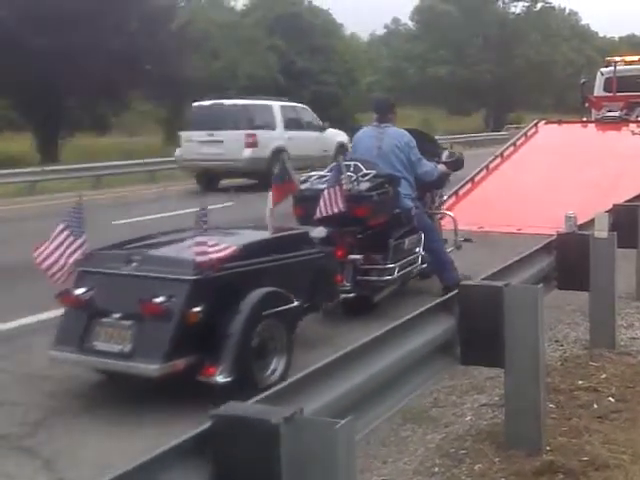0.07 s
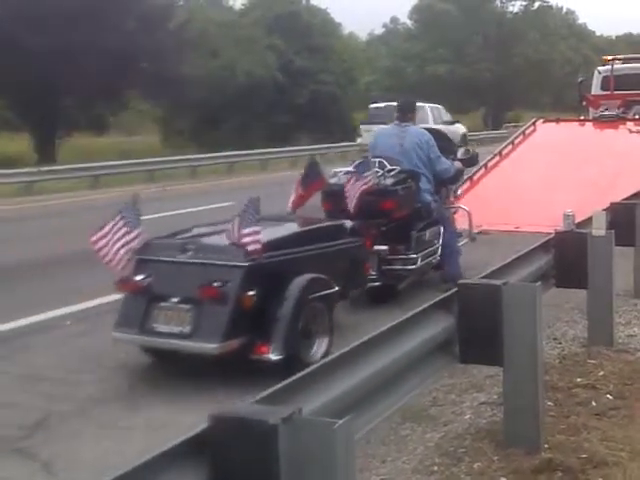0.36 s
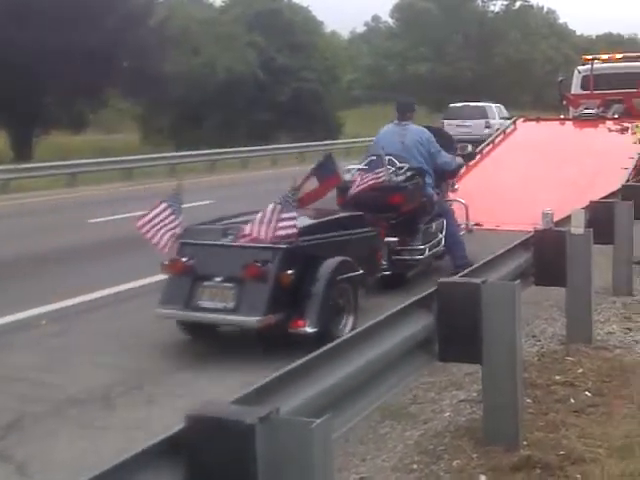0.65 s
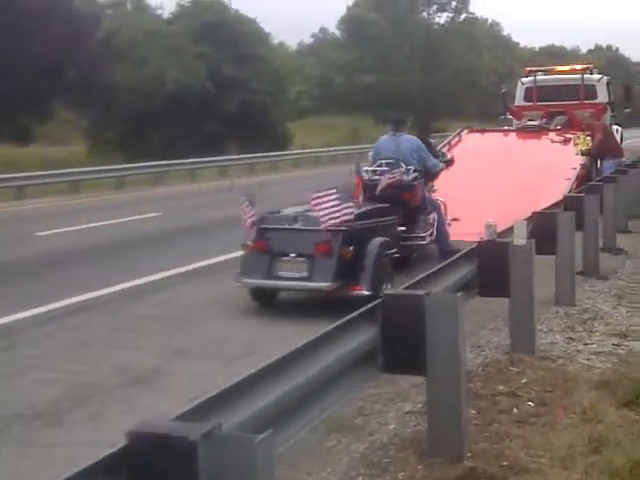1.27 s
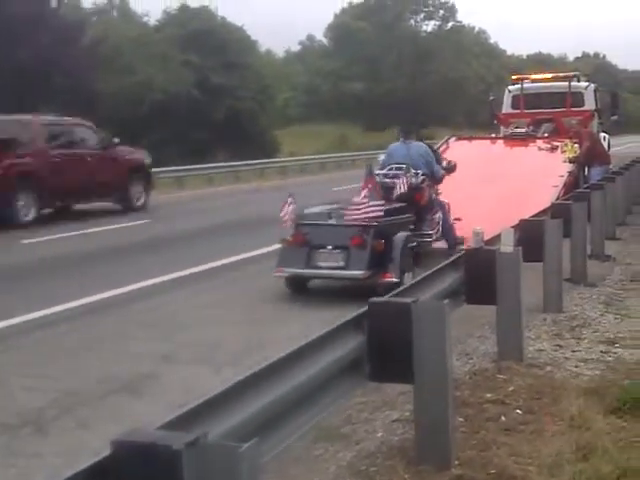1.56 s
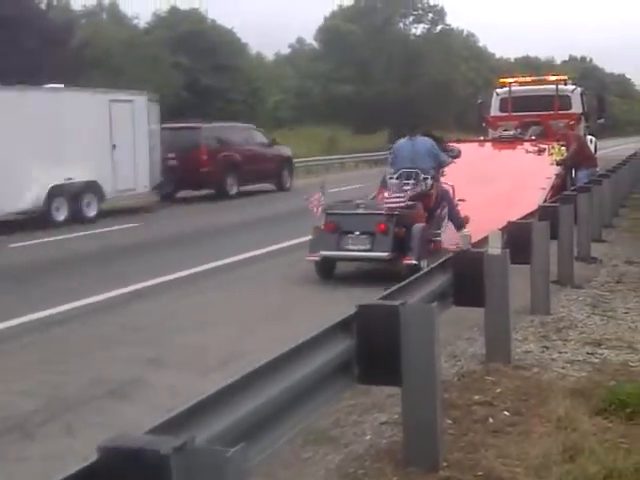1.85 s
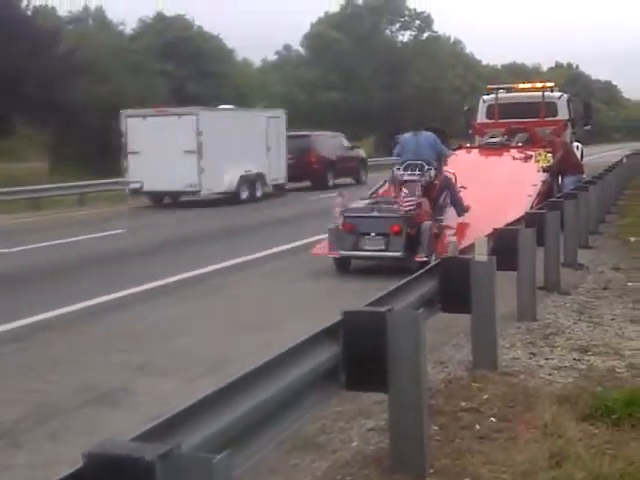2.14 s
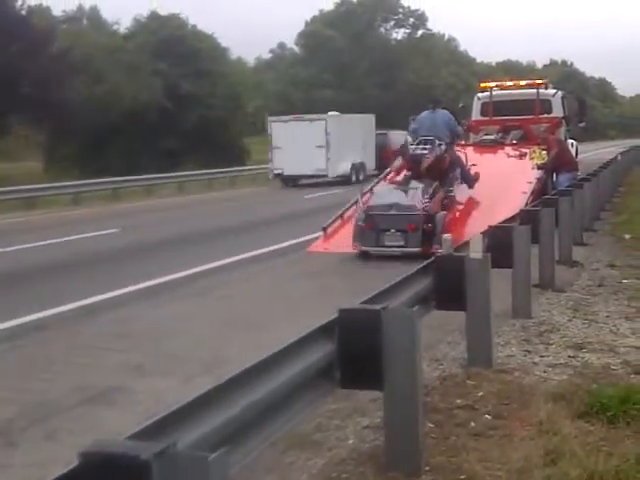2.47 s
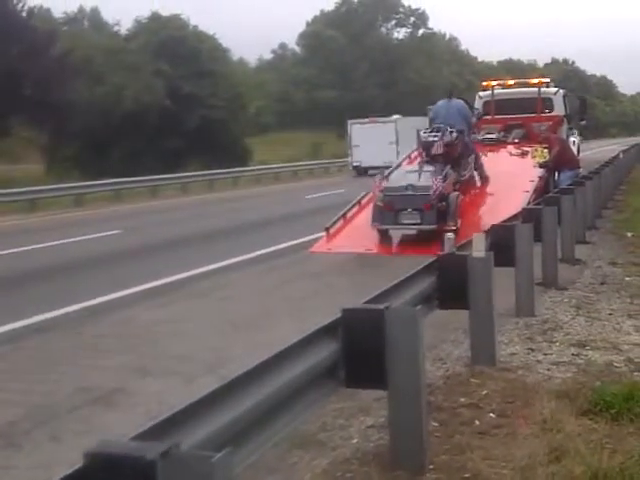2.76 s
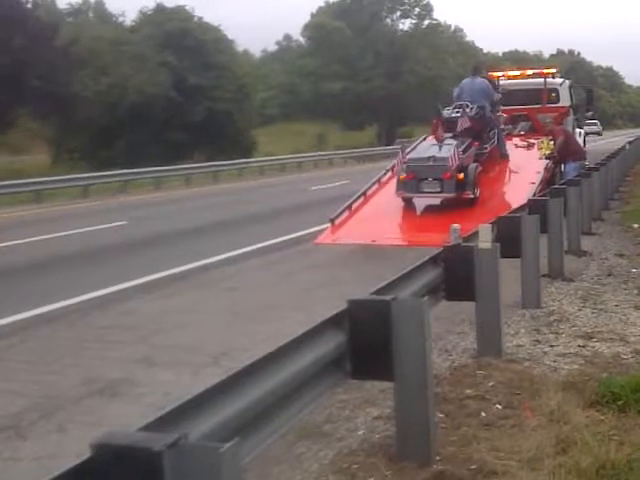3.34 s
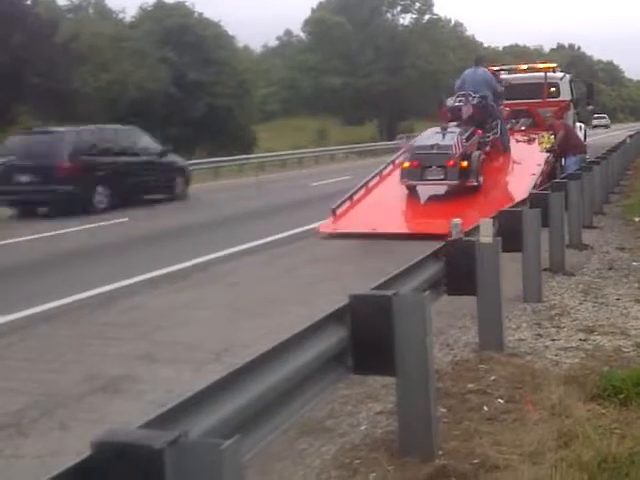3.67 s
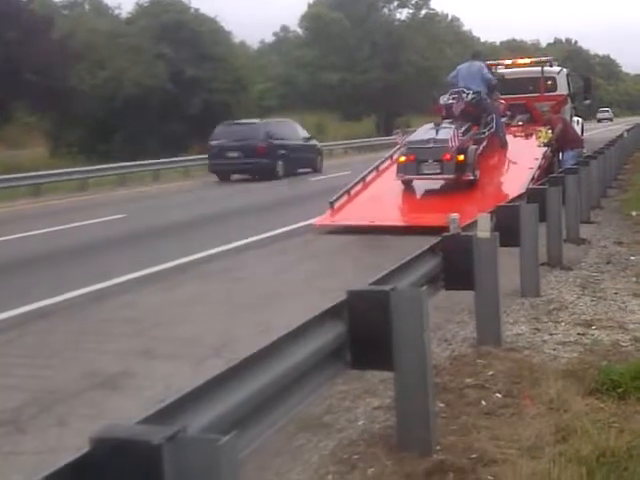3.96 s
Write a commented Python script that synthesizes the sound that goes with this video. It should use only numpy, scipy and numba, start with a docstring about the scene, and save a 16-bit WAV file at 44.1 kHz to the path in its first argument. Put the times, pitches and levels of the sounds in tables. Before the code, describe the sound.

A motorcycle engine chugs close by on a highway shoulder, moves off and falls to a quieter, uneven idle. Cars rush by in the near lanes, a trailer tyre whines briefly midway, and distant traffic rumbles throughout.

```python
"""A V-twin motorcycle pulls away along a highway shoulder, then drops to a lumpy idle.
Each cylinder thumps its own exhaust pipe and lets out a puff of gas that barks and hisses.
Cars sweep past in the near lanes, their tyre noise mirrored by the road, over the wash and rumble
of farther traffic. An SUV with a trailer passes, a trailer tyre whining briefly."""
import sys
import numpy as np
from scipy import signal
from scipy.fft import rfft, irfft
from scipy.io import wavfile
from scipy.ndimage import map_coordinates
from numba import njit

SR = 44100
rng = np.random.default_rng(int(sys.argv[2]) if len(sys.argv) > 2 else 0)


def transcribe(signal):
    """Save signal, clipped to [-1, 1], as a 16-bit WAV file at the path in sys.argv[1]."""
    frames = np.atleast_2d(signal).T
    limited = np.clip(frames, -1, 1)
    pcm = np.round(limited * 32767).astype(np.int16)
    wavfile.write(sys.argv[1], SR, pcm)


N = 176400


def undb(db):
    """Decibels to gain."""
    return 10 ** (np.asarray(db) / 20)


def curve(rows, t, column=1):
    """Table column, linearly interpolated."""
    rows = np.array(rows)
    return np.interp(t, rows[:, 0], rows[:, column])


def noise(spectrum):
    """Unit-rms noise of a given spectral shape, rolled off beyond both ends."""
    hz, db = np.array(spectrum).T
    f = np.maximum(np.fft.rfftfreq(N, 1 / SR), 1)
    gain = undb(np.interp(np.log(f), np.log(hz), db))
    gain *= np.minimum(f / hz[0], 1) ** 2 * np.minimum(hz[-1] / f, 1) ** 2
    y = irfft(rfft(rng.standard_normal(N)) * gain, N)
    return y / y.std()


def delayed(x, lag_s):
    """Time-varying delay."""
    return map_coordinates(x, [np.arange(N) - lag_s * SR], order=3, mode="mirror")


@njit
def resonate(x, hz, width_hz):
    """State-variable band-pass, unity gain at its moving centre."""
    y, band_state, low_state = np.empty(len(x)), 0., 0.
    for i in range(len(x)):
        g, damping = np.tan(np.pi * hz[i] / SR), width_hz / hz[i]
        band = (band_state + g * (x[i] + 1e-18 - low_state)) / (1 + g * (g + damping))
        band_state = 2 * band - band_state
        low_state += 2 * g * band
        y[i] = damping * band
    return y


def ringing(x, modes):
    """Parallel bank of static resonances."""
    return sum(undb(db) * resonate(x, np.full(N, float(hz)), float(width)) for hz, width, db in modes)


# engine speed (time [s], speed [rpm])
ENGINE_RPM = [(0, 1631.1), (.089, 1575), (.286, 1686.9), (.549, 1555.2), (.834, 1520.9), (1.168, 1505.5),
              (1.384, 1591.3), (1.647, 1691.4), (1.919, 1861.6), (2.123, 1843.2), (2.401, 1744.7),
              (2.481, 1571.7), (2.65, 1494.5), (2.836, 1383.7), (3.05, 1302.1), (3.244, 1212.5),
              (3.579, 1129.6), (3.8, 1152.6), (4, 1137.7)]


def firings(t):
    """Firing times of both cylinders: once each per two turns, unevenly spaced."""
    cycles = np.cumsum(curve(ENGINE_RPM, t)) / SR / 120
    first_s = np.interp(np.arange(int(cycles[-1]) + 1), cycles, t)
    return first_s, first_s[:-1] + 0.424 * np.diff(first_s)


# exhaust thump colour at THUMP_REF_RPM: pipe rings plus, in A, a broad 420 Hz band that sharpens
# each thump (frequency [Hz], width [Hz], gain [dB], polarity)
THUMP_A_BANDS = [(50, 51, 31.8, -1), (50, 300, 34, 1), (179.6, 14, 44.7, 1), (420, 184, 40, 1)]
THUMP_B_BANDS = [(71, 23, 27.5, 1), (195.7, 128, 45.6, 1), (184.9, 19.3, 51, -1), (242.6, 41, 42.5, -1)]
THUMP_REF_RPM, THUMP_RISE_PER_RPM = 1579, 0.00026


def pipe_thump(t, times_s, level_db, bands):
    """Pressure pulses thump a pipe; the colour rises with engine speed."""
    kicks = np.zeros(N)
    kicks[np.clip((times_s * SR).astype(int), 0, N - 1)] = undb(level_db)
    pulse = np.hanning(int(0.0052 * SR))
    pressure = np.convolve(kicks, pulse / pulse.sum(), "same")
    tuning = 1 + THUMP_RISE_PER_RPM * (curve(ENGINE_RPM, t) - THUMP_REF_RPM)
    return sum(polarity * undb(db) * resonate(pressure, hz * tuning, float(width))
               for hz, width, db, polarity in bands)


# firing strength (time [s], level [dB])
THROTTLE_DB = [(0, 2.5), (.4, 5), (1.1, 3), (1.9, 4), (2.39, 4), (2.47, -6), (2.63, -4), (2.76, -9),
               (2.97, -9.5), (3.15, -6.5), (3.33, -6), (3.5, -12), (4, -8.5)]
# weak firings at idle (time [s], gain [dB])
WEAK_FIRINGS = [(2.51, -5), (2.585, -21), (2.745, -24), (2.92, -10.5), (3.10, -28), (3.92, -18)]
# gas puff per cylinder at t = 0
# (attack [s], crack decay [s], tail level [dB], tail decay [s], hiss level [dB], bark level [dB])
GAS_PUFFS = [(.002, 0.002, -12, 0.032, -1.5, -2.5), (.003, .008, -13, 0.035, -2.5, -1)]
PUFF_LEAD_S, THUMP_LAG_S, JITTER_S = 0.0032, 0.001, 0.0003


def cylinder(t, times_s, bands, puff):
    """Each firing thumps the pipe and vents gas; returns thump, hiss envelope, bark envelope."""
    level_draw, time_draw, hiss_draw = rng.standard_normal((len(times_s), 3)).T
    firing_db = curve(THROTTLE_DB, times_s) + 0.5 * level_draw
    for at_s, drop_db in WEAK_FIRINGS:
        firing_db += drop_db * (abs(times_s - at_s) < 0.02)
    thump = pipe_thump(t, times_s + THUMP_LAG_S + JITTER_S * time_draw, firing_db - 3, bands)
    attack_s, crack_s, tail_db, tail_s, hiss_db, bark_db = puff
    blur = 1 + 0.45 * t  # puffs grow blunter and less even as the pipes move off
    uneven_db = 0.6 * (0.5 + 1.2 * times_s) * hiss_draw
    attack_s, crack_s = attack_s * blur, crack_s * np.sqrt(blur)
    latest = np.maximum(np.searchsorted(times_s - PUFF_LEAD_S, t) - 1, 0)
    age_s = t - times_s[latest] + PUFF_LEAD_S
    fall_s = np.maximum(age_s - attack_s, 0)
    decay = np.exp(-fall_s / crack_s) + undb(tail_db) * np.exp(-fall_s / tail_s)
    gas = np.clip(age_s / attack_s, 0, 1) * decay
    hiss_env = gas * undb(hiss_db + firing_db + uneven_db)[latest]
    bark_env = gas ** 0.9 * undb(bark_db + firing_db)[latest]  # lingers between firings
    return np.array([thump, hiss_env, bark_env])


def metal_scatter(x, t, t60_s=0.25, wet_db=-7):
    """Short diffuse tail from the guardrail and nearby vehicles."""
    tail = rng.standard_normal(N) * undb(-60 * t / t60_s)
    return undb(wet_db) * signal.fftconvolve(x, tail / np.linalg.norm(tail))[:N]


# gas noise spectra (frequency [Hz], relative density [dB])
HISS_SPECTRUM = [(1500, -20), (2700, 0.5), (3300, -19.5), (3800, 5.5), (4700, 5.5), (5500, 0), (6500, -3),
                 (7400, -19.5), (8200, -35.5)]
BARK_SPECTRUM = [(240, -17.5), (330, 1.5), (420, -2), (520, 0.5), (720, 0), (1050, 11.5), (1500, -6),
                 (1850, 0), (2300, -16.5), (3300, -20)]
# hiss, bark and shell ring as the bike moves off (time [s], gain [dB])
HISS_GAIN_DB = [(0, -26.5), (.45, -30), (1.1, -29), (1.5, -35.5), (2.0, -41), (2.4, -43), (3.2, -38),
                (4, -34)]
BARK_GAIN_DB = [(0, -27), (.7, -27.5), (1.0, -25.5), (1.3, -24.5), (1.7, -27), (2.1, -36), (4, -39.5)]
SHELL_GAIN_DB = [(0, -24.5), (.8, -27), (1.6, -33.5), (2.3, -31.5), (4, -38)]
# silencer shell, pipe ends, a low boom that fills out each thump (frequency [Hz], width [Hz], gain [dB])
SHELL_MODES = [(308, 21, 4), (336.6, 39, 10)]
TIP_MODES = [(4000, 46, -7), (4240, 57, 1), (4750, 42, -1)]
LOW_BOOM_MODES = [(133, 45, -10.5)]


def motorcycle(t, sputter_depth=0.21):
    """Both pipes thump; sputtering gas rings pipe ends and shell and reflects off the asphalt."""
    cylinders = zip(firings(t), (THUMP_A_BANDS, THUMP_B_BANDS), GAS_PUFFS)
    thump, hiss_env, bark_env = sum(cylinder(t, *parts) for parts in cylinders)
    sputter = np.exp(sputter_depth * noise([(100, 0), (500, 0)]) - sputter_depth ** 2)
    hiss = hiss_env * sputter * noise(HISS_SPECTRUM) * undb(curve(HISS_GAIN_DB, t))
    bark = bark_env * noise(BARK_SPECTRUM)
    shell = ringing(bark, SHELL_MODES) * undb(curve(SHELL_GAIN_DB, t))
    bark *= undb(curve(BARK_GAIN_DB, t))
    gas = 0.42 * hiss + 0.4 * ringing(hiss, TIP_MODES) + bark + shell
    thump = thump + ringing(thump, LOW_BOOM_MODES)
    road_echo = 0.14 * delayed(gas, 0.000472 / (1 + 0.26 * t))  # lag shrinks with distance
    return thump + gas + metal_scatter(bark + undb(-5) * thump, t) + road_echo


# tyre roar (frequency [Hz], relative density [dB])
TYRE_SPECTRUM = [(60, -4.5), (250, -1), (450, -2.5), (650, -4), (900, 4.5), (1300, -2), (1900, -23),
                 (2600, -15.5), (3300, -27), (5000, -32), (7000, -39)]
# cars when abreast (time [s], level [dB], distance [m], road echo lag [s],
# tread pitch [Hz], tread gain [dB], groove hiss gain [dB])
CAR_PASSES = [(-.6, -29, 9, .0015, 1090, -0.5, -16.5), (1.12, -34, 8, .0015, 645, 8, -12.5),
              (1.6, -31.5, 7, .0008, 1464, 6.5, -7.5), (3.03, -32, 3, .0009, 1164, 1.5, 2.5),
              (3.329, -35.5, 6, .0016, 580, 0.5, -6), (4.1, -32, 14, 0.001, 1095, -5.5, -12.5)]
CAR_M_S, SOUND_M_S = 29, 343
TREAD_WIDTH_HZ, GROOVE_HZ, GROOVE_WIDTH_HZ = 176, 2680, 920


def passing_cars(t):
    """Doppler-shifted tyre noise; the road echo combs it, lowest when the car is abreast."""
    out = 0
    for at_s, db, lane_m, echo_s, tread_hz, tread_db, groove_db in CAR_PASSES:
        range_m = np.hypot(CAR_M_S * (t - at_s), lane_m)
        nearness = lane_m / range_m
        modes = [(tread_hz, TREAD_WIDTH_HZ, tread_db), (GROOVE_HZ, GROOVE_WIDTH_HZ, groove_db)]
        roar = noise(TYRE_SPECTRUM)
        direct = delayed(roar + ringing(roar, modes), (range_m - lane_m) / SOUND_M_S)
        road_echo = 0.55 * delayed(direct, echo_s * nearness)
        out += (direct + road_echo) * undb(db) * nearness
    return out


# traffic wash and engine rumble (frequency [Hz], relative density [dB])
WASH_SPECTRUM = [(230, -11.5), (450, -15), (650, -18), (900, -2.5), (1170, 3.5), (1500, -2), (1900, -8.5),
                 (2600, -15.5), (3400, -35.5), (5000, -31), (7000, -46.5)]
RUMBLE_SPECTRUM = [(40, -21.5), (65, -5.5), (100, -5), (120, 2), (138, -6.5), (158, 6.5), (190, -9.5),
                   (235, -9), (275, -7.5), (350, -17)]
# traffic wash (time [s], level [dB])
WASH_DB = [(0, -39.5), (1.0, -34.5), (1.7, -30.5), (2.25, -33), (2.65, -29.5), (3.05, -31.5), (3.35, -27.5),
           (3.65, -28.5), (4, -28)]


def far_traffic(t, rumble_db=-31.5):
    """Swelling wash of farther vehicles over a steady engine rumble."""
    wash = noise(WASH_SPECTRUM) * undb(curve(WASH_DB, t))
    return wash + noise(RUMBLE_SPECTRUM) * undb(rumble_db)


# trailer tyre tone (time [s], pitch [Hz], level [dB])
TRAILER_WHINE = [(1.0, 853, -46), (1.22, 847, -39), (1.55, 821, -28), (1.63, 795, -28.5), (1.72, 784, -52)]


def trailer_whine(t, width_hz=45.0):
    """Narrow, smeared tread tone that sinks as the SUV's trailer goes by."""
    hz = curve(TRAILER_WHINE, t)
    band = resonate(rng.standard_normal(N), hz, width_hz)
    tone = resonate(band, hz, width_hz)
    return undb(curve(TRAILER_WHINE, t, column=2)) * tone / tone.std()


def scene():
    """Mono mix of motorcycle, near cars, far traffic and trailer tyre."""
    t = np.arange(N) / SR
    background = far_traffic(t)
    return (motorcycle(t) + passing_cars(t) + background + trailer_whine(t))[None]


def record(dry):
    """Low cut at 52 Hz, steep high cut at 7250 Hz."""
    low_cut = signal.butter(4, 52, "high", fs=SR, output="sos")
    high_cut = signal.ellip(8, 0.2, 70, 7250, fs=SR, output="sos")
    return signal.sosfilt(high_cut, signal.sosfilt(low_cut, dry))


dry = scene()
out = record(dry)
transcribe(out)
```